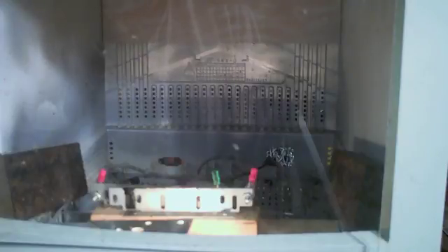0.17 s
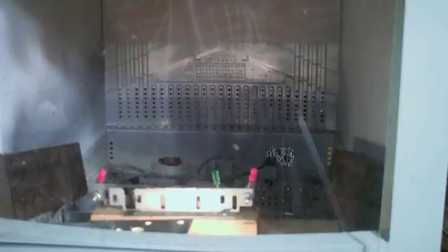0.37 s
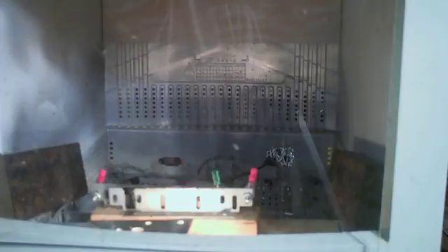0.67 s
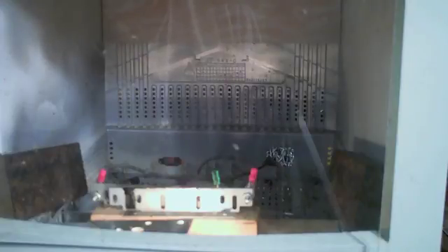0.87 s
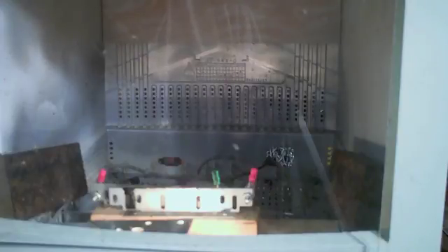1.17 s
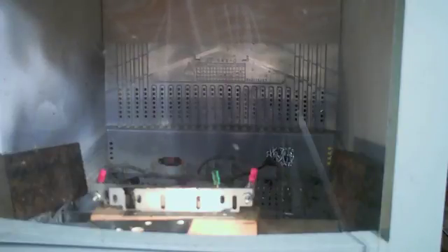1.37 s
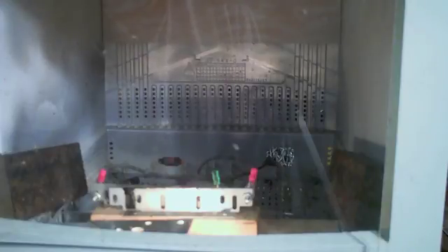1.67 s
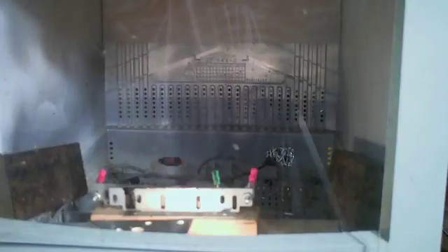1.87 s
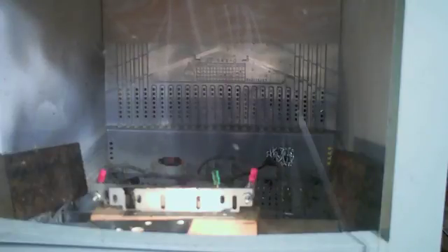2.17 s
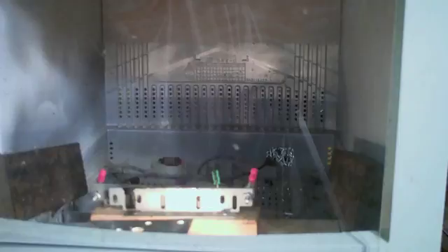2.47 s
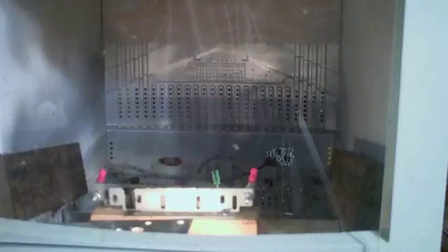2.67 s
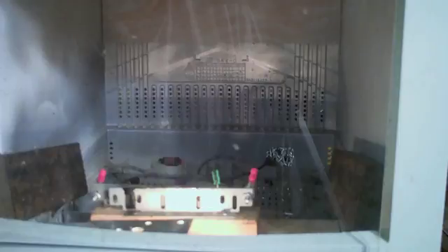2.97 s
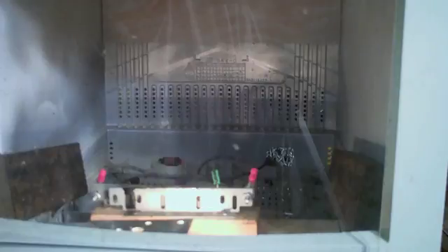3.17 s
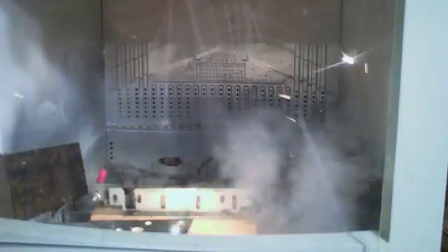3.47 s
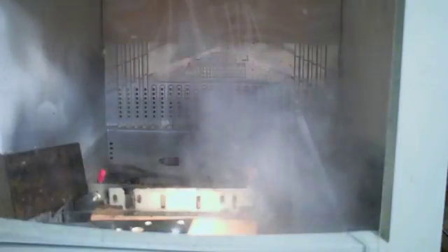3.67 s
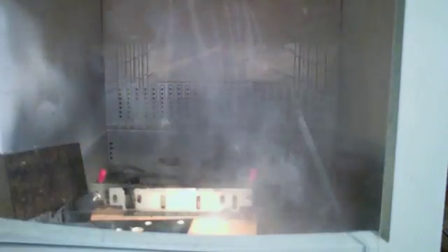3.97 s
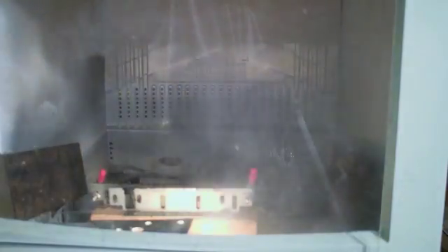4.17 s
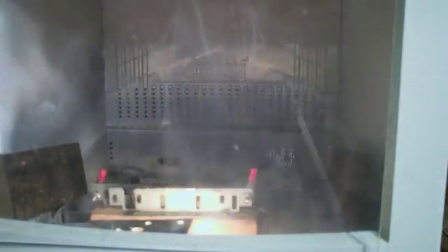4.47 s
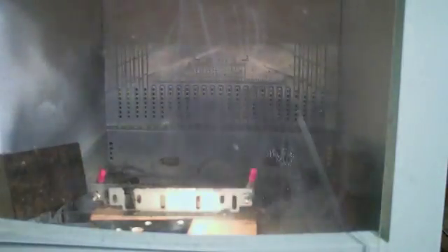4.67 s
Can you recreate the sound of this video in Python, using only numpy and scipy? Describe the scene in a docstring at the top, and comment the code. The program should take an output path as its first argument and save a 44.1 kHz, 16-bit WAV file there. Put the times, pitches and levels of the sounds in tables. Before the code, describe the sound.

A low, steady electrical hum with slowly throbbing fan drone and soft air rush runs throughout. After more than three seconds, a component bursts inside a hard-walled test cabinet: one sharp, overloaded bang with a short clangy ring. A metal shard pings, the torn can bounces with fluttering clinks, tiny scraps tick, and a faint rustle swells and stops. One close microphone, slightly distorted at the peak.

```python
"""Capacitor burst in a test cabinet

A thud through the bench, then a pressure pulse fills the cabinet, shakes its panels and overloads the microphone.
The cabinet rings in noise bands and panel modes, the workshop answers, and can, shard and scraps ring as sines.
Behind it a transformer hums, two fan shafts beat, shaped noise rushes as air and electronics whine faintly.
After the burst a faint rustle swells and stops."""
import sys
import numpy as np
from scipy import signal
from scipy.fft import rfft, irfft
from scipy.io import wavfile

SR = 44100
rng = np.random.default_rng(int(sys.argv[2]) if len(sys.argv) > 2 else 0)


def transcribe(u):
    """Save the signal u as a 16-bit wav file named by the first command-line argument.

    u: samples, shape (n,) or (channels, n), limited to [-1, 1]; the rate is SR.
    q: integer samples, one column per channel.
    """
    v = np.clip(np.atleast_2d(u).T, -1, 1)
    q = np.round(v * 32767).astype(np.int16)
    wavfile.write(sys.argv[1], SR, q)


def rack_gain(trim_db):
    """Turn a fader trim in dB into the linear factor to multiply a signal by."""
    fader = np.asarray(trim_db, float)
    return 10 ** (fader / 20)


N = 212804
T = np.arange(N) / SR


def svf(x, hz, width_hz):
    """Two-pole band-pass, gain 1 at the centre."""
    return signal.lfilter(*signal.iirpeak(hz, hz / width_hz, fs=SR), x)


def svf_twice(x, hz, width_hz):
    """Two equal band-passes in series, for steeper skirts."""
    return svf(svf(x, hz, width_hz), hz, width_hz)


def level(x, rms_db):
    """Scale to an rms level."""
    return x * rack_gain(rms_db) / np.sqrt(np.mean(x ** 2))


def coloured(table, count):
    """Noise with the spectrum of a (Hz, dB) table, interpolated over log frequency."""
    hz = np.maximum(np.arange(count // 2 + 1) * SR / count, 1)
    point_hz, point_db = np.transpose(table)
    gain_db = np.interp(np.log(hz), np.log(point_hz), point_db)
    return irfft(rfft(rng.standard_normal(count)) * rack_gain(gain_db), count)


def walk(rate_hz):
    """Random levels 1 / rate_hz apart, joined by straight lines."""
    count = int(N / SR * rate_hz) + 2
    return np.interp(T * rate_hz, np.arange(count), rng.standard_normal(count))


def tones(lines, start_s, waver_db):
    """Steady sines of (Hz, dB rms), all at zero phase at start_s, each level wavering."""
    out = 0
    for hz, rms_db in lines:
        sine = np.sqrt(2) * np.sin(2 * np.pi * hz * (T - start_s))
        out = out + rack_gain(rms_db + waver_db * walk(3.3)) * sine
    return out


def ring(modes, tilt_db=0, share=1, contact_ms=.5):
    """Decaying sines of a struck thing; tilt is per octave above the first mode, share scales every t60."""
    t = T[:SR // 3]
    out = 0
    for hz, db, t60_s in modes:
        mode_db = db + tilt_db * np.log2(hz / modes[0][0])
        out = out + rack_gain(mode_db - 60 * t / (share * t60_s)) * np.sin(2 * np.pi * hz * t)
    return out * np.minimum(t * 1000 / contact_ms, 1)


def rocking():
    """Loose metal rocks, so its ring flutters: a random gain."""
    return rack_gain(3 * walk(140)[:SR // 3])


def add(out, s, x):
    """Mix x into out from s seconds on."""
    i = int(s * SR)
    out[i:i + len(x)] += x[:N - i]


def rushing_air():
    """Moving air: broadband shaped noise, slightly unsteady, with narrower noise humps on it; the humps near
    150-210 Hz, 3.95 kHz and 11.8 kHz are blurred clusters around the fan and whine tones."""
    # spectrum: hz, relative_density_db
    spectrum = [(20, -14), (45, -22), (75, -18.5), (110, -22), (150, -17), (200, -17), (300, -12),
                (450, -15.5), (800, -19.5), (1300, -22.5), (1700, -27), (2300, -38), (4200, -43),
                (5000, -50), (9000, -55), (11000, -61), (12900, -65), (13300, -85)]
    # humps: centre_hz, width_hz (each of two passes), rms_db
    hump_bands = [(150.4, 6.3, -66), (179.3, 7.3, -65), (208, 10, -66), (295, 60, -58), (350, 40, -65),
                  (609, 60, -62), (1285.4, 70, -66.5), (3950, 230, -87), (8350, 300, -97),
                  (11790, 300, -93)]
    out = level(coloured(spectrum, N), -52) * rack_gain(.5 * walk(6))
    for hz, width_hz, rms_db in hump_bands:
        out = out + level(svf_twice(rng.standard_normal(N), hz, width_hz), rms_db)
    return out


def fans():
    """Two shafts at nearly the same speed beat; blades and motors add wavering tones."""
    # fan shafts: hz, rms_db
    shafts = [(28.22, -56), (29.55, -50)]
    # blade and motor tones: hz, rms_db
    blades = [(88.6, -72), (149.51, -65), (178.86, -67), (209.77, -71), (268.18, -61), (290.61, -66),
              (354.51, -68), (388.14, -68), (415.42, -72), (478.14, -72), (590.8, -65), (627.58, -68),
              (629.47, -71), (1289.32, -78)]
    in_step_s = .963
    return tones(shafts, in_step_s, .3) + tones(blades, 0, 2.5)


def transformer():
    """Core hum at twice the mains frequency, with multiples."""
    # hum: multiple of hum_hz, rms_db
    multiples = [(1, -44), (2, -49.5), (3, -66), (5, -69)]
    hum_hz = 119.97
    return tones([(k * hum_hz, rms_db) for k, rms_db in multiples], 0, .3)


def whine():
    """Electronics: a high tone and multiples; the odd ones turn over many times a second and split into pairs."""
    # whine: multiple of whine_hz, rms_db before turning over
    multiples = [(1, -86.5), (2, -104), (3, -95.5)]
    whine_hz, flip_hz = 3941.07, 14.98
    turn = 2 * np.pi * flip_hz * T
    flip = np.sqrt(2) * (np.cos(turn) - .5 * np.cos(3 * turn))
    out = 0
    for k, rms_db in multiples:
        out = out + tones([(k * whine_hz, rms_db)], 0, .6) * (flip if k % 2 else 1)
    return out


def background():
    """The steady bed: transformer, fans, whine and air."""
    return transformer() + fans() + whine() + rushing_air()


def rustle():
    """A faint rustle of shaped noise comes up, swells slowly and stops."""
    start_s, rise_s, hold_s, fall_s = 3.93, .07, .39, .06
    swell_db_per_s = 14
    # hz, relative_density_db
    spectrum = [(1200, -14), (1550, 3), (1950, 0), (2300, -9), (2800, -3), (3400, -12), (5000, -17.5),
                (9000, -21.5), (12500, -34)]
    t = T - start_s
    gate = np.clip(np.minimum(t / rise_s, 1 + (rise_s + hold_s - t) / fall_s), 0, 1)
    grain = level(coloured(spectrum, N), -72)
    return grain * gate * rack_gain(swell_db_per_s * t + 2.5 * walk(40))


def scraps():
    """Small scraps tick: short, high modes."""
    # scrap modes: hz, relative_db, t60_s
    modes = [(4310, -2, .035), (4210, -11, .025), (4470, -9, 0.08), (4640, -13, .02), (8860, -14, .02),
             (10300, -14, .02)]
    # ticks: start_s, gain_db, tilt_db_per_octave
    ticks = [(4.1487, -68, 0), (4.1976, -57, 0), (4.234, -54, -8), (4.2505, -52, -8), (4.2965, -63, 2),
             (4.3333, -57, -4), (4.3792, -64, -4)]
    out = np.zeros(N)
    for start_s, gain_db, tilt_db in ticks:
        add(out, start_s, rack_gain(gain_db) * ring(modes, tilt_db, contact_ms=1.2))
    return out


def shard():
    """A metal shard hits the wall while the bang dies and rings with a flutter."""
    # shard modes: hz, level_db, t60_s
    modes = [(4425, -36, .13), (5110, -40, .2), (8860, -52, .08), (10660, -49, .12), (11640, -38.5, .045)]
    out = np.zeros(N)
    add(out, 3.478, ring(modes, contact_ms=1.5) * rocking())
    return out


def torn_can():
    """The can bounces: each ring flutters as it rocks, then is damped; a noise tick marks each landing."""
    # can modes: hz, relative_db, undamped_t60_s
    modes = [(1160, 1, 0.37), (1188, -5.5, 0.36), (1101, -16, .12), (1282, -14, .2), (2620, -27, .15),
             (4060, -21, .06), (4190, -24, .14)]
    # bounces: start_s, gain_db, damped_after_s, tilt_db_per_octave
    bounces = [(3.6500, -37.5, 0.086, 1), (3.7640, -44, .027, 2), (3.798, -45.5, .028, -2)]
    damp_db_per_s, tick_db = 1500, 5
    out = np.zeros(N)
    for start_s, gain_db, damped_s, tilt_db in bounces:
        free = ring(modes, tilt_db, contact_ms=4) * rocking()
        damping_db = damp_db_per_s * np.maximum(T[:len(free)] - damped_s, 0)
        add(out, start_s, free * rack_gain(gain_db - damping_db))
        add(out, start_s, rack_gain(gain_db + tick_db) * svf(cabinet_air(.2), 3500, 7000))
    return out


def debris():
    """Can, scraps and shard with a short smear of cabinet echo: decaying noise, t60 0.1 s."""
    out = torn_can() + scraps() + shard()
    t = T[:SR // 8]
    echo = rng.standard_normal(len(t)) * rack_gain(-45 - 60 * t / .1)
    return out + signal.fftconvolve(out, echo)[:N]


def workshop():
    """The room beyond the cabinet answers longer and duller: decaying shaped noise."""
    # spectrum: hz, relative_density_db
    spectrum = [(150, -30), (300, -8), (700, 0.5), (1300, 0.5), (2000, -10), (4000, -10.5), (7000, -26),
                (12000, -50)]
    start_rms_db, t60_s = -25, .42
    t = T[:SR // 2]
    return level(coloured(spectrum, len(t)), start_rms_db) * rack_gain(-60 * t / t60_s)


def cabinet_air(share=1, build_ms=2.1):
    """Dense echoes between hard walls: noise bands 0.4 octave apart, each dying at its own pace."""
    # cabinet echoes: hz, relative_density_db, full_t60_s
    decay_points = [(100, -15, 0.18), (200, -21, 0.29), (302, -10, .2), (491, -34, .25), (650, -7, .25),
                    (1000, -8, .25), (1600, -17, .26), (2070, -23, .25), (3560, -13, .23),
                    (4900, -28, 0.18), (6500, -21.5, .2), (8000, -27, 0.21), (10000, -25.5, .19),
                    (12400, -30, .14), (14500, -38, .07), (16000, -60, .06)]
    t, out = T[:SR // 3], 0
    point_hz, point_db, point_t60_s = np.transpose(decay_points)
    for hz in 100 * 2 ** np.arange(0, 7.4, .4):
        band = svf_twice(rng.standard_normal(len(t)), hz, hz / 2.5)
        band_db = np.interp(np.log(hz), np.log(point_hz), point_db)
        t60_s = np.interp(np.log(hz), np.log(point_hz), point_t60_s)
        out = out + band * rack_gain(band_db - 60 * t / (share * t60_s))
    # a low-pass dulls the top of the cabinet echoes
    out = signal.sosfilt(signal.butter(4, 14000, fs=SR, output="sos"), out)
    return out * np.minimum(t / (build_ms / 1000), 1)


def cabinet_panels(share=1, contact_ms=.5):
    """Sheet panels ring in their own modes."""
    # panel modes: hz, relative_db, full_t60_s
    modes = [(266.5, -17.5, .2), (288.2, -16, .18), (337, -24.5, 0.19), (407.2, -23.5, 0.27),
             (638, -20, 0.22), (716, -19, 0.28), (796, -25, .2), (900, -24, .2), (966, -22, .2),
             (1011, -21, .22), (1180, -22, .2), (1300, -24, 0.37), (1558, -28, .2), (2200, -32, .2),
             (3200, -30, .25)]
    return ring(modes, share=share, contact_ms=contact_ms)


def later_swells():
    """Later swells of the ringing, air and panels, each in its own band; the last is a faint knock."""
    # swells: start_s, gain_db, centre_hz, width_hz, share of full decay (0-1)
    swells = [(3.391, -0.5, 1000, 500, 0.48), (3.4215, 4, 380, 501, 0.48), (3.493, -12.5, 280, 120, 0.43),
              (3.659, -22, 2400, 1100, .55)]
    out = np.zeros(N)
    for start_s, gain_db, hz, width_hz, share in swells:
        ringing = rack_gain(5.5) * cabinet_air(share) + cabinet_panels(share, contact_ms=3)
        add(out, start_s, rack_gain(gain_db) * svf(ringing, hz, width_hz))
    return out


def bench_thud():
    """Solid wood carries the shock faster than air: one low mode plus cabinet echoes."""
    return rack_gain(-19) * (ring([(261, 0, .05)]) + rack_gain(8) * cabinet_air())


def pressure_pulse():
    """N-shaped air pulse: one sine cycle with a warped phase."""
    pulse_ms = 1.35
    u = np.linspace(0, 1, int(pulse_ms * SR / 1000))
    return rack_gain(1) * np.sin(2 * np.pi * u ** .85)


def burst():
    """Thud through the bench, pulse through the air, then cabinet and workshop answer."""
    thud_s, burst_s = 3.3737, 3.3782
    out = later_swells()
    add(out, thud_s, bench_thud())
    add(out, burst_s, pressure_pulse())
    add(out, burst_s + .001, rack_gain(13) * cabinet_air(build_ms=.77) + cabinet_panels())
    add(out, burst_s, workshop())
    return out


def scene():
    """Everything reaches one microphone."""
    return (background() + rustle() + debris() + burst())[None]


def band_limit(x):
    """A steep low-pass at the top of the band."""
    return signal.sosfilt(signal.butter(12, 15880, fs=SR, output="sos"), x)


def record(dry):
    """The capsule overloads softly; its port nearly cancels one narrow band; the top is cut."""
    ceiling, notch_hz, notch_width_hz, top_hz = .75, 7850, 330, 15310
    x = ceiling * np.tanh(dry[0] / ceiling)
    x = x - .9 * svf(x, notch_hz, notch_width_hz)
    x = signal.sosfilt(signal.ellip(8, .2, 70, top_hz, fs=SR, output="sos"), x)
    return band_limit(x[None])


dry = scene()
out = record(dry)
transcribe(out)
```